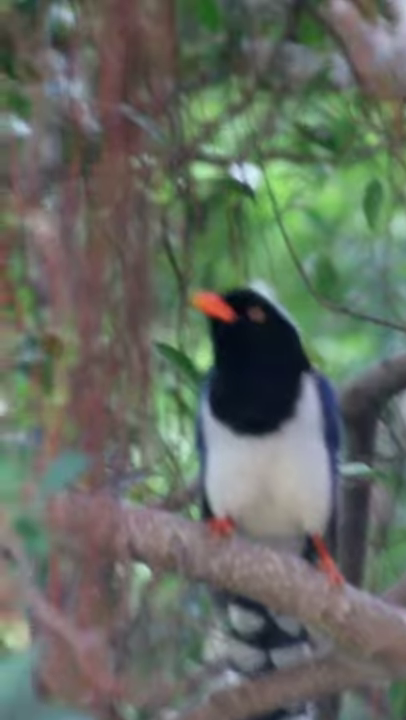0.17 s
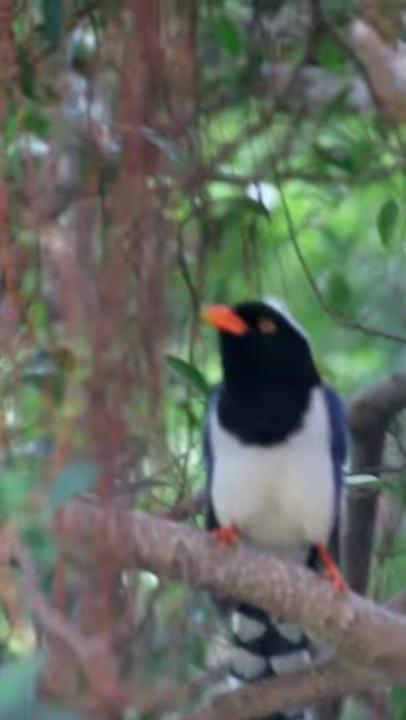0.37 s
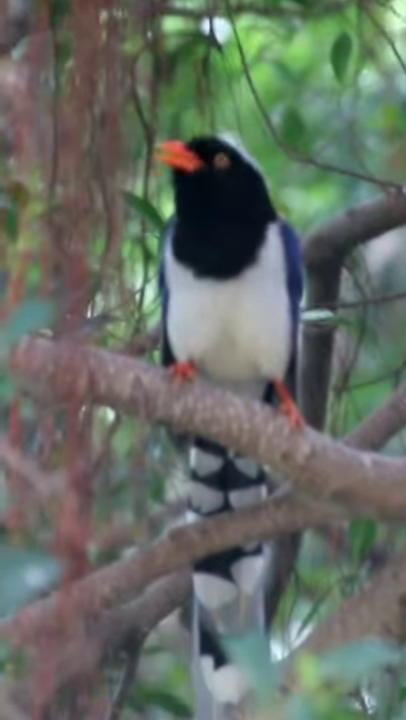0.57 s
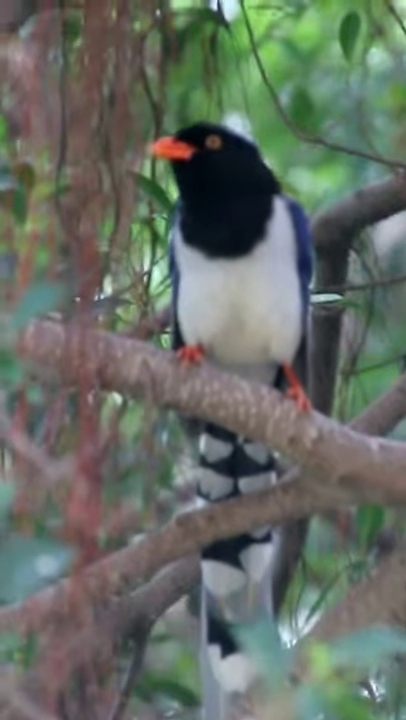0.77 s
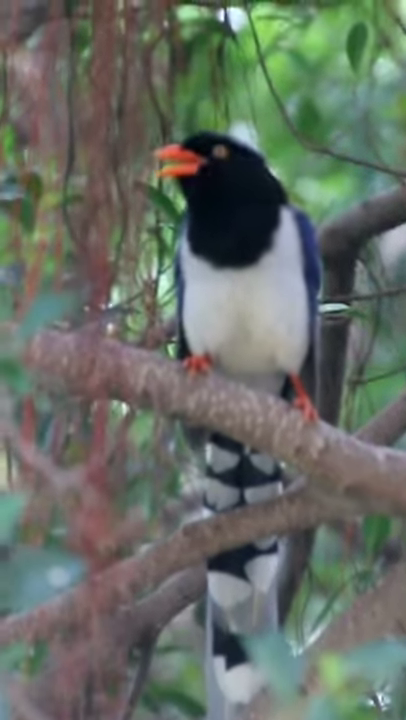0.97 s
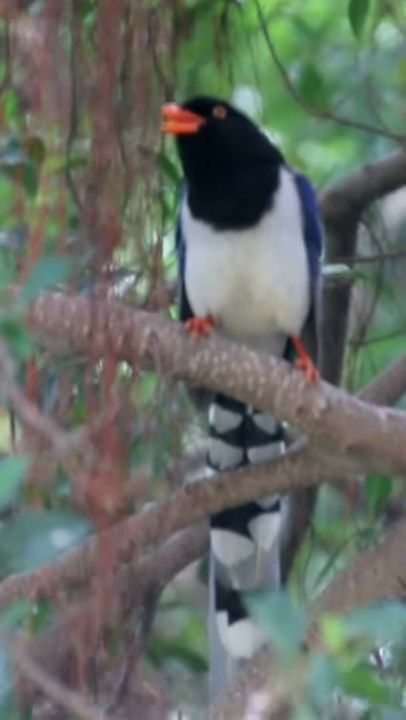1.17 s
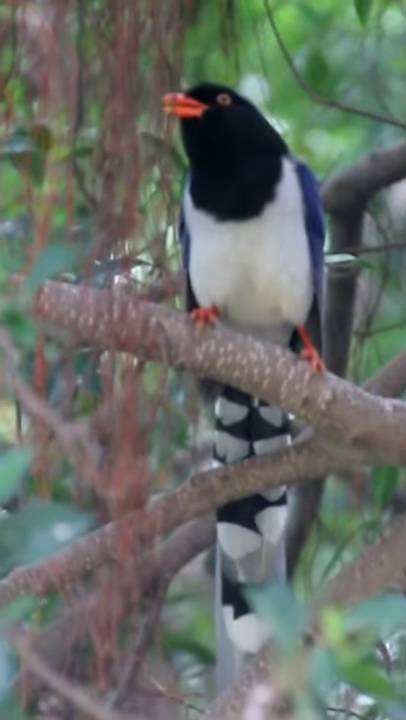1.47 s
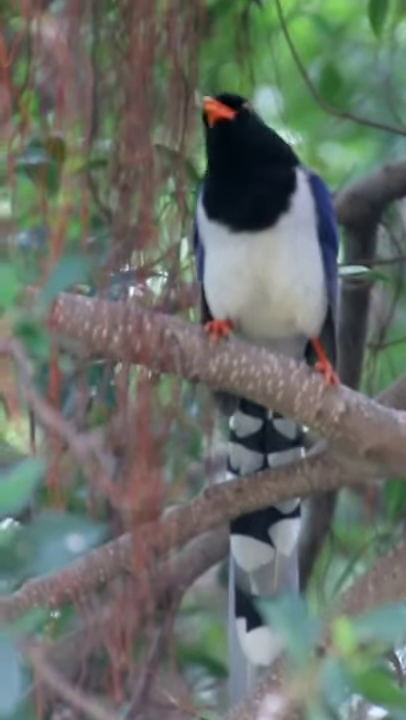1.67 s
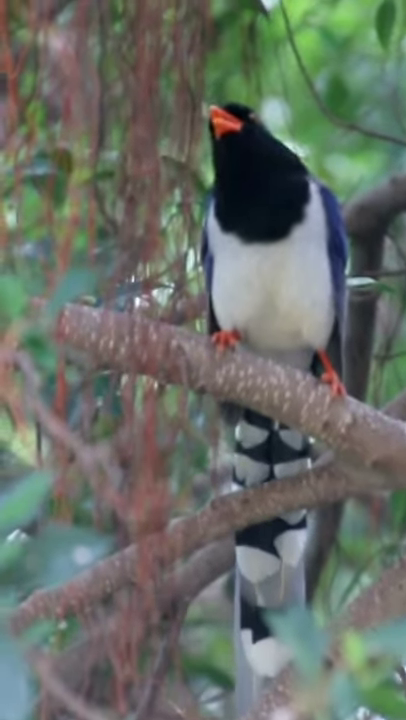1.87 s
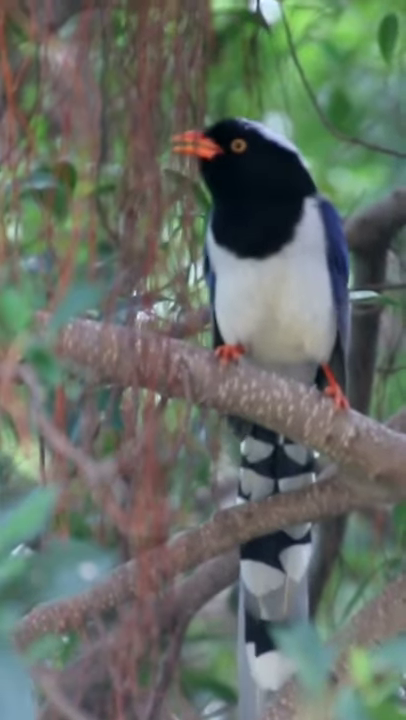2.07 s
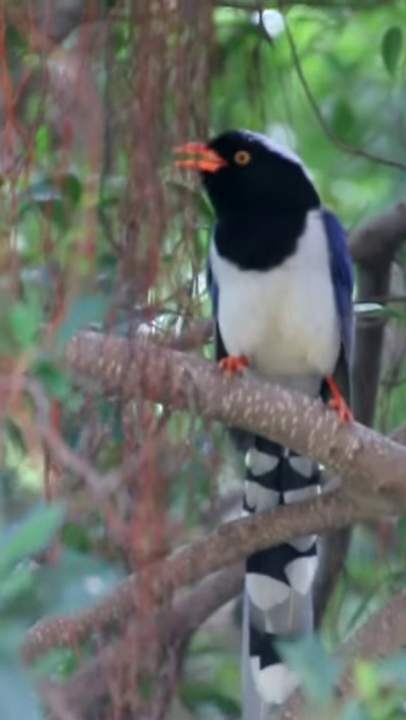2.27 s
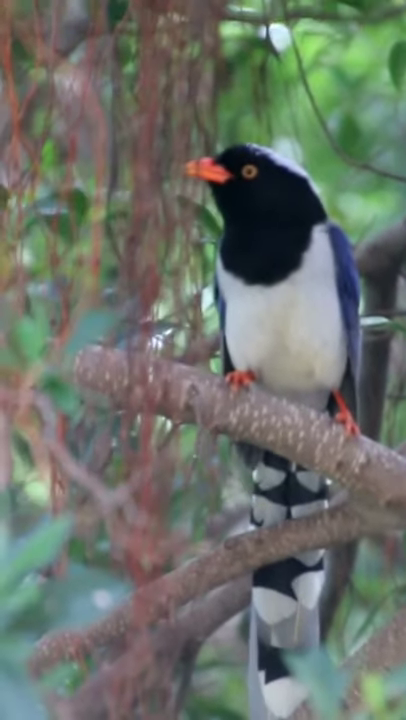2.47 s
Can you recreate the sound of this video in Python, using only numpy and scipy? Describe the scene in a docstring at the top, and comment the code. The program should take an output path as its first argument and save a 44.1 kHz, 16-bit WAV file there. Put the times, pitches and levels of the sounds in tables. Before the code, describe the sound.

Among trees, a nearby magpie chatters seven raspy, upward-sweeping notes after a short, high whistle. Each note echoes lightly over a constant rumble like far traffic, and another bird whistles softly in the distance at the end.

```python
"""Magpie chattering in the trees

A magpie on a branch gives one thin whistle, then seven harsh chattering notes. Each note is one
fast upward sweep of the voice: raspy while low, then loud and warbling as it meets the throat's
resonance. The trees echo it; behind are a steady low rumble, a far bird and a faint high tone."""
import sys
import numpy as np
from scipy import signal
from scipy.fft import rfft, irfft, next_fast_len
from scipy.io import wavfile
from scipy.ndimage import map_coordinates

SR = 44100
rng = np.random.default_rng(int(sys.argv[2]) if len(sys.argv) > 2 else 0)


def to_wav(sig):
    """Store sig (one row per channel, or 1-D mono) as 16-bit WAV at the path in sys.argv[1].

    Samples outside -1..1 are clipped; the rate is SR.
    """
    pcm = np.clip(np.atleast_2d(sig), -1, 1) * 32767
    pcm = np.round(pcm).astype(np.int16)
    wavfile.write(sys.argv[1], SR, pcm.T)  # frames by channels


N = 115983


def amp(db):
    """Decibels to gain."""
    return 10 ** (np.asarray(db) / 20)


def unit(x):
    """Scale to rms 1."""
    return x / np.sqrt(np.mean(x ** 2) + 1e-20)


def along(points, hz):
    """Read a curve of (Hz, value) points on a log frequency axis."""
    f, v = np.transpose(points)
    return np.interp(np.log(hz + 1), np.log(f + 1), v)


def clock():
    """Time of every sample in seconds."""
    return np.arange(N) / SR


def wobble(rate):
    """A smooth random curve, rate knots a second."""
    return map_coordinates(rng.standard_normal(2 * N // 10), [clock() * rate], order=3)


def filtered(x, response):
    """Pass x through a frequency response."""
    size = next_fast_len(N + SR // 2)
    return irfft(rfft(x, size) * response(np.fft.rfftfreq(size, 1 / SR)), size)[..., :N]


def noise(spectrum):
    """Coloured noise of rms 1."""
    return unit(filtered(rng.standard_normal(N), lambda hz: amp(along(spectrum, hz))))


def pan(db):
    """Left and right gains; positive leans left."""
    return amp([[db], [-db]])


def spread(mid, side, width):
    """Mid and side to left and right."""
    return np.array([mid + width * side, mid - width * side])


def warbled(hz, depth, rate, jitter):
    """A pitch with a quick uneven warble and fine jitter."""
    cycle = 2 * np.pi * np.cumsum(rate * (1 + .15 * wobble(60))) / SR
    return hz * (1 + depth * np.sin(cycle) + jitter * wobble(1100))


def voice(hz, levels_db, shimmer_db=1.9):
    """Harmonics on a pitch curve, shimmering in level."""
    phase = 2 * np.pi * np.cumsum(hz) / SR
    tone = sum(amp(db) * np.sin(k * phase) * (k * hz < SR / 2) for k, db in enumerate(levels_db, 1))
    return np.sqrt(2) * tone * amp(shimmer_db * wobble(350))


# Colour of the rumble. Each row: frequency in Hz, relative level in dB.
RUMBLE_COLOUR = [(15, -41), (25, -17), (55, -0.5), (133, -2), (198, -1.5), (289, -1), (340, -1.5),
                 (421, -5.5), (582, -5.5), (631, -5), (970, -6.5), (1380, -11.5), (1570, -13.5),
                 (2420, -18), (3440, -22.5), (10600, -41), (15500, -54.5)]
# Its stereo width. Each row: frequency in Hz, side level against mid in dB.
RUMBLE_SIDE = [(60, -20.5), (300, -19), (700, -14), (1400, -8), (4000, 2), (12000, 1.5)]
# Hums inside it. Each row: pitch in Hz, level in dB.
DRONES = [(67, -48.5), (222, -45), (447, -54.5), (748, -56)]
# Fader ride on the whole bed. Each row: time in seconds, gain in dB.
RUMBLE_SWELL = [(.05, -0.1), (.45, 0.7), (1.1, 0.27), (1.8, 0.8), (2.6, 1)]


def rumble(level_db=-28.5):
    """A steady low bed, as of far traffic, with wavering drones; wider in the treble."""
    t = clock()
    drone = np.zeros(N)
    for hz, db in DRONES:
        phase = 2 * np.pi * hz * t
        drone += amp(db) * unit(wobble(14) * np.cos(phase) + wobble(14) * np.sin(phase))
    mid = amp(level_db) * noise(RUMBLE_COLOUR) + drone
    side = amp(level_db) * filtered(noise(RUMBLE_COLOUR), lambda hz: amp(along(RUMBLE_SIDE, hz)))
    swell = amp(np.interp(t, *np.transpose(RUMBLE_SWELL)))
    return spread(mid, side, width=.97) * pan(.61) * swell


def thin_tone(start_s=2.33, end_s=2.59, hz=10411, db=-66):
    """A very faint high tone near the end, perhaps an insect."""
    progress = np.clip((clock() - start_s) / (end_s - start_s), 0, 1)
    fade = (4 * progress * (1 - progress)) ** .3
    return fade * voice(hz + 15 * wobble(100), [db])


# Each row: start and length in seconds, first and last pitch in Hz, level in dB.
FAR_CALLS = [(2.275, .07, 1480, 1420, -33), (2.485, 0.066, 1500, 1600, -37.5),
             (2.552, .1, 1630, 1636, -38.5)]


def far_bird():
    """Soft gliding whistles, blurred by distance."""
    out = np.zeros(N)
    for start, length, from_hz, to_hz, db in FAR_CALLS:
        progress = np.clip((clock() - start) / length, 0, 1)
        fade = np.sqrt(4 * progress * (1 - progress))
        pitch = from_hz + (to_hz - from_hz) * progress + 14 * wobble(150)
        out += fade * voice(pitch, [db])
    return out


def scatter(colour, t60, build_s, width):
    """A diffuse stereo echo of energy 1 that builds up and dies away."""
    hz, t, bands = signal.stft(rng.standard_normal((2, SR)), SR, nperseg=256)
    decay_db = 60 * t / along(t60, hz)[:, None]
    build = 1 - np.exp(-t / build_s)
    bands = bands * amp(along(colour, hz)[:, None] - decay_db) * build
    mid, side = signal.istft(bands, SR, nperseg=256)[1][:, :SR]
    return unit(spread(mid, side, width)) / np.sqrt(SR)


# Echo EQ; leaves scatter the treble most. Each row: frequency in Hz, relative level in dB.
BRANCHES_COLOUR = [(2000, 1), (3200, 0), (4300, 3.5), (6500, 1), (10000, -1), (15000, 2)]
GROVE_COLOUR = [(1000, -3), (3200, 0), (4400, 0), (6500, 0), (9200, 0.5), (15000, -1)]
# Echo decay. Each row: frequency in Hz, seconds to fall by 60 dB.
BRANCHES_T60 = [(3000, 0.026), (10000, 0.098)]
GROVE_T60 = [(1000, 0.33), (3200, 0.49), (4500, .62), (6500, 0.49), (10000, 0.37), (15000, 0.1)]


def trees(x):
    """Quick scatter from near branches, then a longer tail from the grove."""
    near = amp(-3) * scatter(BRANCHES_COLOUR, BRANCHES_T60, build_s=.00091, width=.91)
    tail = amp(-11.5) * scatter(GROVE_COLOUR, GROVE_T60, build_s=.019, width=.8)
    return signal.fftconvolve(x[None], near + tail, axes=1)[:, :N]


# Each row: frequency in Hz, relative level in dB.
RASP_COLOUR = [(800, -66), (1900, 4), (2600, 1.5), (3250, 11), (4000, -4), (4900, -4), (6300, 0),
               (7500, -5.5), (10000, -11), (13000, -17.5), (15500, -28)]


def rasp():
    """The harsh noise in the magpie's voice."""
    return noise(RASP_COLOUR)


# Shape of the opening whistle. Each row: time in seconds, pitch in Hz, level in dB.
WHISTLE_CURVE = [(0.266, 2893, -46), (.269, 3095, -23.5), (0.273, 3100, -22.5), (0.274, 4260, -31),
                 (0.295, 4170, -29), (0.317, 4380, -29), (0.339, 4570, -28), (.354, 4570, -28.5),
                 (.364, 4490, -36)]
# Its harmonics in dB, from the fundamental up.
WHISTLE_HARMONICS = [0, -15, -34]


def magpie_whistle(catch_s=.271, catch_width_s=.0051):
    """The voice catches with a puff of rasp, jumps up and holds a thin warbling tone."""
    t = clock()
    times, hz, db = np.transpose(WHISTLE_CURVE)
    pitch = warbled(np.interp(t, times, hz), depth=.027, rate=92, jitter=.013)
    tone = voice(pitch, WHISTLE_HARMONICS) + amp(-14) * rasp()
    envelope = amp(np.interp(t, times, db)) * (t > times[0]) * (t < times[-1])
    catch = amp(-30.5) * np.exp(-((t - catch_s) / catch_width_s) ** 2) * rasp()
    return tone * envelope + catch


# The chatter. Each row: start, attack length, register break and end in seconds, level in dB,
# pitch ratio, lateness of the first rise (1 is even), share of the final climb,
# rasp trim and overtone trim in dB.
NOTES = [(.507, .014, .559, .591, -14.5, .98, .85, 1, 1, -3),
         (.928, .011, .975, 1.019, -11.5, 1.03, .7, .9, -1.5, 0),
         (1.120, .022, 1.175, 1.215, -12.5, 1.01, 1, 1.05, -1, -1),
         (1.360, .024, 1.422, 1.465, -14, 1.0, 1.05, 1, -1, -1),
         (1.774, .028, 1.839, 1.866, -14, 1.05, 1.15, .55, 1, 0),
         (1.947, .02, 2.007, 2.052, -13.5, 1.0, 1, 1, 0, 1.5),
         (2.193, .022, 2.260, 2.299, -16, 1.02, 1, 1.05, -.5, -2.5)]
# The gesture all notes share. Each row: stage (0 start, 1 break, 2 end), base pitch in Hz,
# voice gain and rasp gain in dB.
SWEEP = [(0, 1590, -13, -16), (.42, 1700, -1, -13.5), (.61, 1830, -1, -14), (.77, 2040, -1, -13),
         (.92, 2290, -3, -11), (1, 2980, -1.5, -11), (1.3, 3200, -.5, -14), (1.62, 3360, 0, -15),
         (1.76, 3830, -2, -16), (2, 3820, -6.5, -20)]
# Harmonics in dB, from the fundamental up, before and after the break.
HARMONICS_LOW = [-3.5, -5, -8, -11.5, -7, -16]
HARMONICS_HIGH = [-1.5, -4, -5, -16, -22, -28]
# The throat's resonances. Each row: frequency in Hz, gain in dB.
THROAT = [(900, -28), (1550, -24), (1850, -12.5), (2300, -5.5), (2750, -10.5), (3150, 1.5), (3600, -9.5),
          (4150, -5.5), (4900, -22.5), (5700, -10.5), (6500, -10), (7800, -20.5), (10000, -23),
          (15000, -53)]


def magpie_chatter(release_s=.0075, climb_from_hz=2600, grain_db=2.2):
    """Every note runs through the same sweep; the throat shapes its harmonics, and rasp rides on it."""
    t = clock()
    playing = np.clip(np.searchsorted([note[0] for note in NOTES], t) - 1, 0, None)
    start, attack, turn, end, db, ratio, late, climb, rasp_trim, bright_db = np.array(NOTES)[playing].T
    first_rise = np.clip((t - start) / (turn - start), 0, 1) ** late
    stage = first_rise + np.clip((t - turn) / (end - turn), 0, 1)
    stages, *curves = np.transpose(SWEEP)
    pitch, voice_db, rasp_db = [np.interp(stage, stages, curve) for curve in curves]
    pitch -= (1 - climb) * np.maximum(pitch - climb_from_hz, 0)
    high = np.clip((stage - .85) / .2, 0, 1)  # crossfade into the high register
    depth = .05 * (.39 + .63 * high)
    hz = warbled(pitch * ratio, depth, rate=118, jitter=.028 * (1.2 - .19 * high))
    levels = []
    for k, (low_db, high_db) in enumerate(zip(HARMONICS_LOW, HARMONICS_HIGH), 1):
        source_db = low_db + (high_db - low_db) * high + bright_db * (k > 1)
        levels.append(source_db + along(THROAT, np.abs(k * hz)))
    grit = rasp() * amp(rasp_db + rasp_trim + grain_db * wobble(800))
    gate = np.clip((t - start) / attack, 0, 1) * np.clip((end - t) / release_s + .5, 0, 1)
    return gate * amp(db) * (amp(voice_db) * voice(hz, levels) + grit)


def scene(left_lead_s=5e-6):
    """The magpie and its echo, near the centre, over the distant layers."""
    magpie = magpie_chatter() + magpie_whistle()
    # Each note gets its own slightly different echo from the trees.
    playing = np.searchsorted([note[0] for note in NOTES], clock())
    echo = sum(trees(magpie * (playing == k)) for k in range(len(NOTES) + 1))
    direct = filtered(magpie, lambda hz: np.exp(1j * np.pi * left_lead_s * np.array([hz, -hz])))
    return (direct + echo) * pan(.04) + far_bird() + thin_tone() + rumble()


def record(dry, start_s=.0355, top_hz=15750):
    """A moment's silence, a 1 ms fade-in and a hard cut of the highest treble."""
    fade_in = np.clip((clock() - start_s) * 1000, 0, 1)
    return filtered(dry * fade_in, lambda hz: hz < top_hz)


dry = scene()
out = record(dry)
to_wav(out)
```